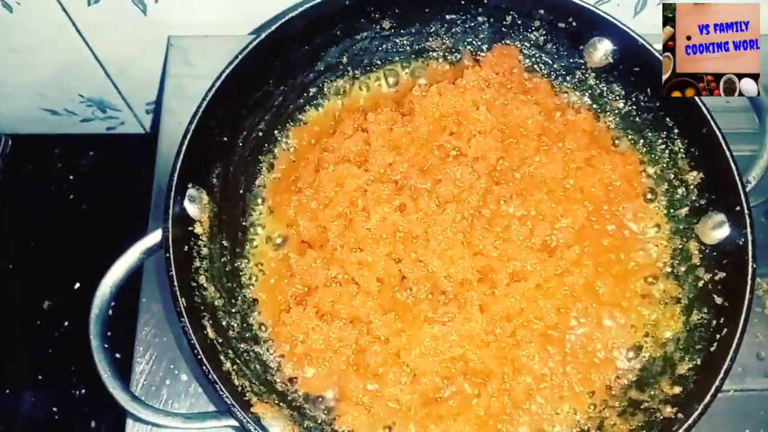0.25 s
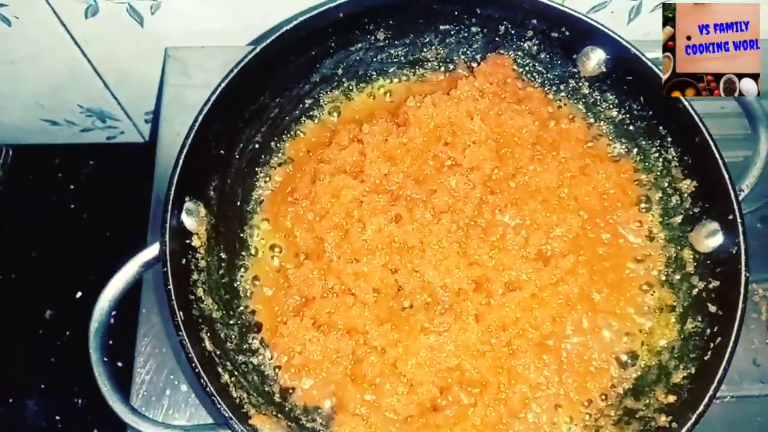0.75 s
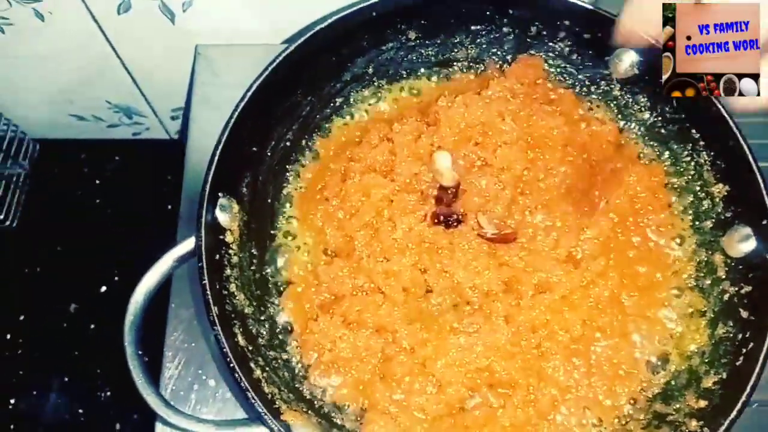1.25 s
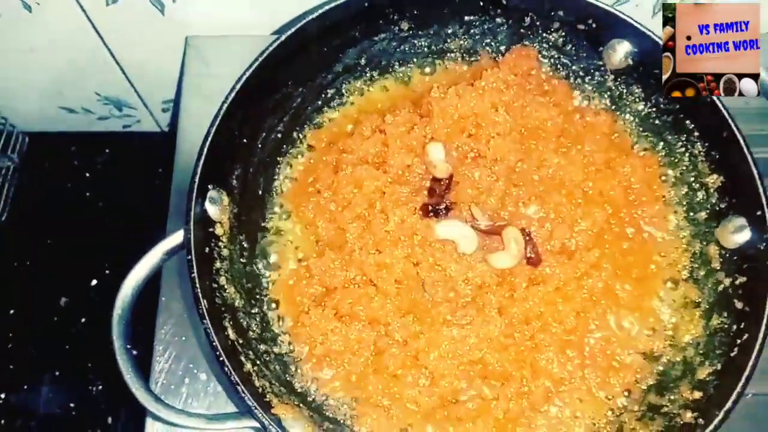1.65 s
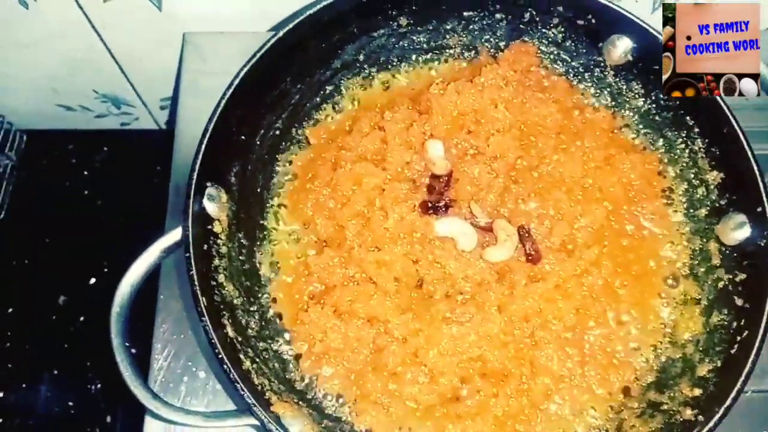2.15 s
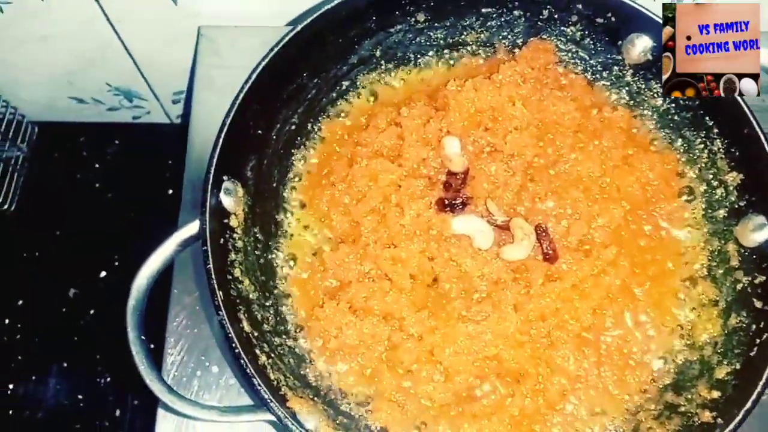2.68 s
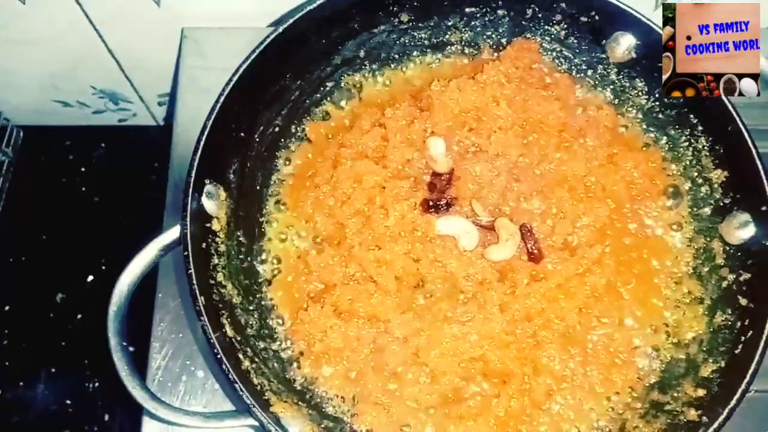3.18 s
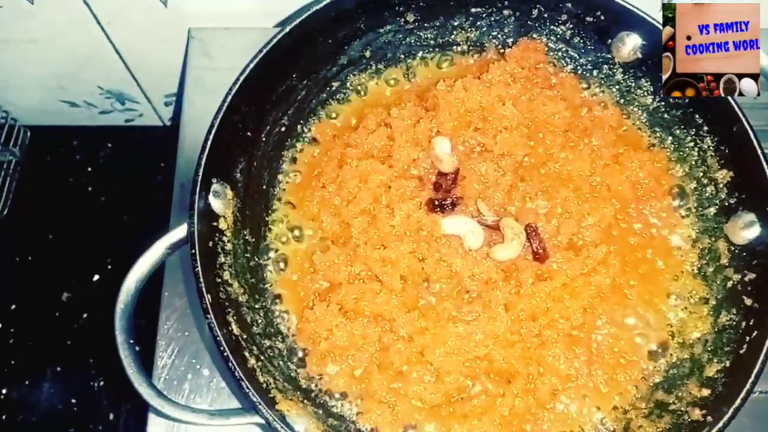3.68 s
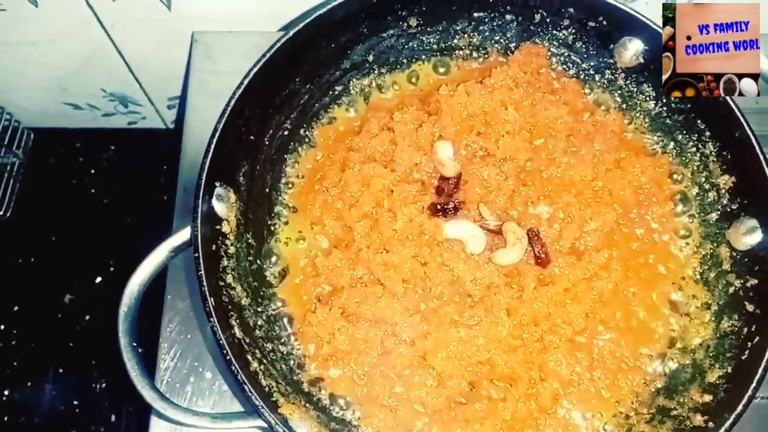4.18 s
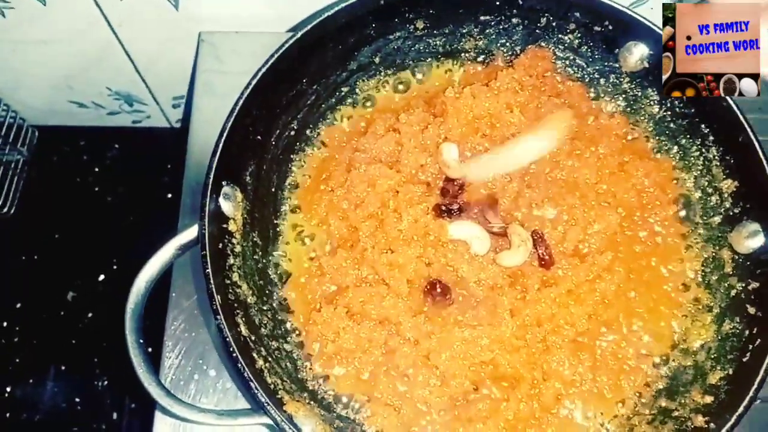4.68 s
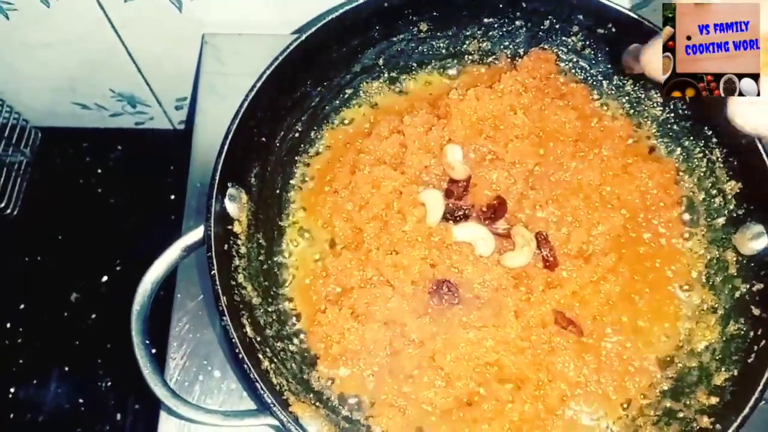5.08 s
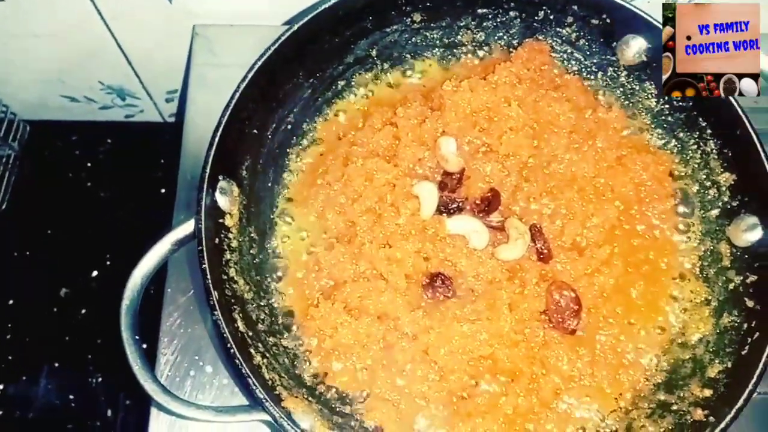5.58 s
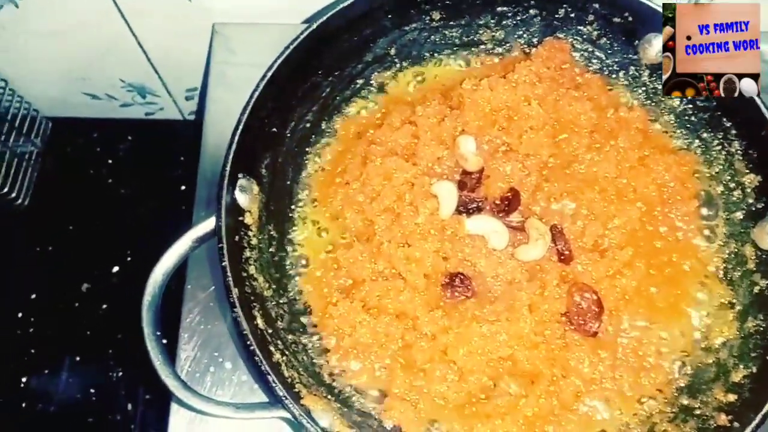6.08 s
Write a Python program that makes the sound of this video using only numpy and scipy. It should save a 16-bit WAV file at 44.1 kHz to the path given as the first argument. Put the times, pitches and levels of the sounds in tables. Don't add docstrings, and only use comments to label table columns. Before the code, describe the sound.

Close, even fizzing of hot fat around a bubbling paste, two small clacks at the start, scattered pops and light taps, low burner murmur.

```python
import sys
import numpy as np
from scipy import signal
from scipy.io import wavfile
from scipy.ndimage import uniform_filter1d

SR = 44100
rng = np.random.default_rng(int(sys.argv[2]) if len(sys.argv) > 2 else 0)


def field_ratio(decibels):
    return 10 ** (np.asarray(decibels, dtype=float) / 20)


def digitize_waveform(pressure):
    field = np.atleast_2d(pressure).T
    bounded = np.clip(field, -1, 1)
    quanta = np.round(bounded * 32767).astype(np.int16)
    wavfile.write(sys.argv[1], SR, quanta)


N = 279594

# [f/Hz, density/dB per Hz]
FIZZ_SPECTRUM = [(310, -37), (520, -20.5), (731, -8), (850, -2), (1030, 0.5), (1190, -6.5), (2060, -1),
                 (2860, -2), (4380, -2.5), (6600, 0.5), (9300, -6.5), (11800, -15), (13900, -14),
                 (14700, -2)]
# [f/Hz, width/Hz, level/dB]
FIZZ_HUMPS_AND_DIPS = [(910, 58, 0.5), (1240, 31, -2), (1300, 55, 4.5), (1620, 39, 2), (1820, 71, 1.5),
                       (2370, 200, -4.5), (3330, 150, -2.5), (6500, 220, 2), (7560, 1000, -0.5), (8640, 350, 3.5)]
# [t/s, level/dB]
FRYING_HEAT = [
    (0.0, -41.5),
    (0.39, -44),
    (1.52, -42.5),
    (2.28, -43.5),
    (2.61, -43),
    (5.98, -43),
    (6.34, -43.5),
]
# [t/s, peak level/dB, f/Hz, length/ms]
SPITS = [(.0275, -29, 6500, 1.5), (.113, -34, 4170, 0.91), (1.5102, -33, 4500, .6),
         (1.5117, -24, 6500, 1.2), (1.5118, -35, 3220, .8), (1.5348, -21, 5200, 0.48),
         (1.5354, -13.5, 5640, 0.63), (1.536, -30, 8300, .8), (1.536, -19, 4800, 0.93),
         (1.5412, -21, 4280, 0.36), (1.542, -31, 8300, .9), (1.5437, -32, 3500, 1.3),
         (1.5465, -26, 4700, 1.6), (2.773, -24, 5200, 0.37), (3.7067, -19.5, 5250, 0.56),
         (3.7067, -21, 9800, 0.2), (3.707, -29.5, 3600, 1.2), (3.7078, -21, 6500, 0.8),
         (3.709, -33, 5370, 1.3)]
# [t/s, peak level/dB, f/Hz]
POPS = [(0.3484, -32, 6570), (0.5324, -28, 6690), (0.6684, -31, 7330), (1.0954, -35, 6290),
        (1.9534, -36, 5770), (2.3054, -37, 6080), (3.1234, -33, 6140), (3.2264, -33, 6490),
        (3.6054, -32, 5690), (3.9705, -31, 6500), (4.3934, -30, 6460), (4.59, -27, 7500),
        (4.7884, -33, 7250), (5.1205, -29, 6000), (5.2174, -32, 6060), (5.9214, -36, 6600),
        (5.9734, -41, 6550)]
# [t/s, peak level/dB, f/Hz]
THUMPS = [(0.206, -43.5, 182), (0.449, -52, 196), (0.927, -47.5, 174), (1.06, -49, 99), (1.124, -51, 187),
          (1.468, -55, 182), (1.59, -46, 100), (1.741, -53, 108), (1.798, -51, 110), (1.937, -54, 175),
          (2.096, -46, 200), (2.206, -45, 120), (2.546, -52, 207), (2.886, -49, 166), (3.875, -51, 200),
          (3.935, -49, 191), (4.154, -44, 179), (4.22, -46, 182), (4.293, -44.5, 191), (4.461, -51, 205),
          (4.912, -46.5, 185), (5.047, -48, 186), (5.156, -48, 105), (5.576, -46, 102), (5.667, -52, 102),
          (6.097, -49, 170), (6.261, -44, 211)]
# [f/Hz, peak level/dB, ring T60/s]
CUP_MODES = [
    (3170, -27, 0.028),
    (2760, -32, 0.036),
    (2070, -35, 0.017),
    (1155, -29.5, 0.025),
    (770, -33.5, 0.025),
]
# [f/Hz, peak level/dB, ring T60/s]
LID_MODES = [
    (2180, -34, .04),
    (1830, -28.5, 0.022),
    (1500, -31, 0.019),
    (1180, -36, .035),
]
# [t/s, peak level/dB, f/Hz]
TAPS = [(.135, -35, 2050), (3.435, -39, 1820), (3.443, -39, 1200), (3.597, -41, 1820), (3.603, -36, 1810),
        (3.606, -36.5, 1320), (3.615, -41, 1200), (3.632, -40, 1010), (3.654, -36, 1240),
        (3.656, -41, 2010), (3.671, -42, 1970), (3.687, -41, 1460), (3.7065, -36, 1900),
        (3.708, -40.5, 1300), (3.736, -39, 1130), (5.84, -41.5, 2050), (5.879, -44, 966),
        (6.099, -39.5, 990)]
# [t/s, peak level/dB, f/Hz]
KNOCKS = [(0.037, -37, 293), (0.057, -50, 311), (0.113, -41, 251), (0.139, -45.5, 299), (0.17, -48, 272),
          (2.124, -50.5, 267), (2.305, -47.5, 294), (2.394, -49.5, 234), (2.436, -48, 246),
          (2.533, -44.5, 234), (2.633, -49.5, 284), (2.71, -48.5, 304), (3.33, -43, 291), (3.392, -50, 296),
          (3.451, -50, 293), (3.608, -42.5, 286), (3.627, -42, 293), (3.652, -39.5, 285), (3.683, -46, 241),
          (3.728, -46, 254), (3.754, -53, 277), (5.905, -42.5, 266.5), (5.94, -46, 253), (6.064, -46, 293),
          (6.099, -46.5, 283), (6.165, -48, 284), (6.204, -52, 287), (6.285, -43.5, 288)]
# [f/Hz, density/dB per Hz]
MURMUR_SPECTRUM = [(25, -30), (50, -24), (75, -10.5), (92, -2), (110, 1.5), (140, -14), (175, 2.5),
                   (200, -2.5), (260, -6), (360, -11.5), (430, -10.5), (520, -20), (620, -9), (900, -38)]
# [t/s, level/dB, centre f/Hz, width/Hz]
SPLITS = [
    (1.74, -60, 9200, 3000),
    (1.81, -51, 6500, 1500),
    (2.367, -53, 6940, 2490),
    (2.413, -52, 6630, 1500),
    (3.575, -52, 5700, 2500),
    (4.155, -57, 5200, 1190),
    (4.782, -63, 11900, 2500),
    (5.432, -52, 5860, 2490),
    (5.71, -56, 9000, 1200),
]
# [f/Hz, level re usual/dB]
DROPOUT_LIMITS = [(1500, -8), (2330, -4.5), (2800, -6.5), (3300, -2.6), (3800, -5), (5000, -6.5),
                  (9500, -6.5), (11500, -4.2), (13700, -2.6), (14200, -6)]

FIZZ_DB, CRACKLE_DB, CRACKLES_PER_S = -42, -50.5, 1500
TOP_FOLLOWS, LOW_FOLLOWS = 1, 0.35
POP_MS = 0.56
SPRAY_S, SPRAY_GAP_S, SPRAY_DB, SPRAY_FADE_DB, SPRAY_HZ, SPRAY_MS = 1.549, 0.0043, -33, -1.3, 5270, 1.4
CUP_S, LID_S = 0.0252, 0.1104
LAG_CYCLES = 2.31
TAP_T60_S, TAP_UPPER_DB, FIRM_UPPER_DB = 0.03, -10, -9.5
THUMP_T60_S, KNOCK_T60_S = 0.13, 0.16
MURMUR_DB, SWELL_DB, SWELLS_PER_S = -64, 1.8, 9
KITCHEN_T60_S, KITCHEN_DB = 0.33, -5
EDGE_HZ = 15490


def evened(x):
    return x / np.sqrt(np.mean(x ** 2) + 1e-20)


def smoothed(x, size_0, size_1):
    return uniform_filter1d(uniform_filter1d(x, size=size_0, axis=0), size=size_1, axis=1)


def read(points, hz):
    f, value = np.transpose(points)
    return np.interp(np.log(hz + 1), np.log(f + 1), value)


def add(mix, s, sound):
    part = mix[round(s * SR):][:len(sound)]
    part += sound[:len(part)]


def passed(x, order, hz, side):
    return signal.sosfiltfilt(signal.butter(order, hz, btype=side, fs=SR, output="sos"), x)


def band_noise(chance, order, low_hz, high_hz):
    band = signal.butter(order, (low_hz, high_hz), btype="band", fs=SR, output="sos")
    return evened(signal.sosfilt(band, chance))


def noise(colour_db, size, patchy_db, flicker_db):
    frames, hz = 4 * N // size + 5, np.fft.rfftfreq(size, 1 / SR)
    a, b, patches, flicker = rng.standard_normal((frames, len(hz), 4)).T
    patches = evened(smoothed(patches, 5, 5))
    flicker = evened(smoothed(flicker, 400, 3))
    level_db = colour_db(hz)[:, None] + patchy_db * patches + flicker_db * flicker
    z = (a + 1j * b) * field_ratio(level_db) * (hz < EDGE_HZ)[:, None]
    return evened(signal.istft(z, nperseg=size, noverlap=3 * size // 4)[1][:N])


def sizzle():
    s, db = np.transpose(FRYING_HEAT)
    heat_db = np.interp(np.arange(N) / SR, s, db - np.median(db))
    fizz = field_ratio(FIZZ_DB) * noise(fizz_db, size=1024, patchy_db=1.2, flicker_db=0.5) + crackle()
    top = passed(fizz, 3, 10000, "high")
    low = passed(fizz, 3, 2500, "low")
    middle = fizz - top - low
    return field_ratio(heat_db) * middle + field_ratio(TOP_FOLLOWS * heat_db) * top + field_ratio(LOW_FOLLOWS * heat_db) * low


def fizz_db(hz):
    humps_and_dips = sum(db * np.exp(-((hz - f) / width) ** 2) for f, width, db in FIZZ_HUMPS_AND_DIPS)
    return read(FIZZ_SPECTRUM, hz) + humps_and_dips


def crackle():
    out = np.zeros(N)
    size = field_ratio(3.0 * np.minimum(rng.exponential(1, N), 4.4))
    size = size * (rng.random(N) < CRACKLES_PER_S / SR)
    kind = rng.integers(0, 20, N)
    for k, hz in enumerate(np.geomspace(900, 13800, num=20)):
        cycles = np.arange(round(30 * SR / hz)) * hz / SR
        grain = cycles * np.exp(-cycles / 1.96) * np.sin(2 * np.pi * cycles * (1 + 0.0027 * cycles))
        grain *= field_ratio(fizz_db(hz)) * np.sqrt(hz) / np.linalg.norm(grain)
        out += signal.oaconvolve(size * (kind == k), grain)[:N]
    return field_ratio(CRACKLE_DB) * evened(out)


def spits():
    out, t = np.zeros(N), np.arange(-200, 200) / SR
    pops = [(s, db, hz, POP_MS) for s, db, hz in POPS]
    spray = []
    for k, (late, sharp) in enumerate(rng.standard_normal((6, 2))):
        s = SPRAY_S + SPRAY_GAP_S * (k + 0.15 * late)
        spray.append((s, SPRAY_DB + k * SPRAY_FADE_DB, SPRAY_HZ * (1 + 0.19 * sharp), SPRAY_MS))
    for s, db, hz, ms in SPITS + spray + pops:
        swell = field_ratio(db) * np.exp(-(1800 * t / ms) ** 2)
        add(out, s - 200 / SR, swell * np.cos(2 * np.pi * hz * t))
    return out


def thumps():
    return rings(THUMPS, THUMP_T60_S, rise=0.0066, partners=((.55, -14), (1.1, -14)))


def rings(rows, t60, rise, partners):
    out, t = np.zeros(N), np.arange(SR // 2) / SR
    for (s, db, hz), turn in zip(rows, rng.random((len(rows), 4))):
        tone = np.sin(2 * np.pi * hz * t)
        for (ratio, ratio_db), phase in zip(partners, turn):
            tone += field_ratio(ratio_db) * np.sin(2 * np.pi * (ratio * hz * t + phase))
        add(out, s, field_ratio(db - 60 * t / t60) * (1 - np.exp(-t / rise)) * tone)
    return out


def utensils():
    firm = [(s + LAG_CYCLES / hz, db, hz, t60, FIRM_UPPER_DB)
            for s, modes in ((CUP_S, CUP_MODES), (LID_S, LID_MODES)) for hz, db, t60 in modes]
    light = [(s, db, hz, TAP_T60_S, TAP_UPPER_DB) for s, db, hz in TAPS]
    return ticks(firm + light, rise=0.00013, spread=(.62, 1.3, 1.75), rough=0.28)


def ticks(rows, rise, spread, rough):
    out, t = np.zeros(N), np.arange(SR // 10) / SR
    for (s, db, hz, t60, upper_db), chance in zip(rows, rng.standard_normal((len(rows), len(t)))):
        upper = sum(np.sin(2 * np.pi * hz * k * t + p) for k, p in zip(spread, 3 * chance[-4:]))
        crack = band_noise(chance, 2, 0.89 * hz, 2.15 * hz)
        tone = np.sin(2 * np.pi * hz * t) + field_ratio(upper_db) * upper + rough * crack
        add(out, s, field_ratio(db - 60 * t / t60) * (1 - np.exp(-t / rise)) ** 2 * tone)
    return out


def counter_knocks():
    return rings(KNOCKS, KNOCK_T60_S, rise=0.0024, partners=((.82, -9.5), (1.5, -17.5), (2.3, -16.5)))


def kitchen(x, t60):
    at = np.arange(130, SR // 2, 20)
    taps = np.zeros(SR // 2 + 20)
    sign = rng.choice([-1., 1.], len(at))
    taps[at + rng.integers(0, 20, len(at))] = sign * field_ratio(-60 * at / SR / t60)
    return signal.oaconvolve(x, taps / np.linalg.norm(taps))[:N]


def murmur():
    rumble = noise(lambda hz: read(MURMUR_SPECTRUM, hz), size=4096, patchy_db=1.0, flicker_db=1.0)
    deep = passed(rumble, 4, 140, "low")
    top = passed(rumble, 4, 230, "high")
    middle = rumble - deep - top
    return field_ratio(MURMUR_DB + 3) * (flame_swell() * deep + flame_swell() * middle + top)


def flame_swell():
    t, rates = np.arange(0, N, 256) / SR, np.geomspace(1, SWELLS_PER_S, num=16)[:, None]
    drift = evened(np.sin(2 * np.pi * (rates * t + rng.random((16, 1)))).sum(0))
    return field_ratio(SWELL_DB * np.interp(np.arange(N) / SR, t, drift))


def splits():
    out = np.zeros(N)
    for (s, db, hz, width), chance in zip(SPLITS, rng.standard_normal((len(SPLITS), 2048))):
        puff = band_noise(chance, 7, hz - width / 2, hz + width / 2) * np.hanning(2048)
        add(out, s - 1024 / SR, field_ratio(db + 5) * puff)
    return out


def dropouts(x):
    hz, _, z = signal.stft(x, SR, nperseg=1024, noverlap=768)
    power = smoothed(abs(z) ** 2, 4, 4) + 1e-20
    below_usual_db = 10 * np.log10(power / np.median(power, axis=1, keepdims=True))
    weak = below_usual_db < read(DROPOUT_LIMITS, hz)[:, None]
    keep = np.where(weak, field_ratio(-9), 1.) * (hz < EDGE_HZ)[:, None]
    return signal.istft(z * keep, SR, nperseg=1024, noverlap=768)[1][:N]


def scene():
    taps, drops, knocks = utensils(), spits(), counter_knocks()
    echoes = kitchen(field_ratio(KITCHEN_DB) * taps + field_ratio(-11) * knocks, KITCHEN_T60_S)
    echoes = echoes + field_ratio(-5) * kitchen(drops, t60=0.16)
    mono = sizzle() + drops + thumps() + taps + knocks + echoes + murmur()
    return np.array([mono, mono])


def band_limit(x):
    return signal.sosfilt(signal.butter(12, 16860, fs=SR, output="sos"), x)


def record(dry):
    mid, side = dropouts(dry.mean(0)), splits()
    return band_limit(np.array([mid + side, mid - side]))


dry = scene()
out = record(dry)
digitize_waveform(out)
```